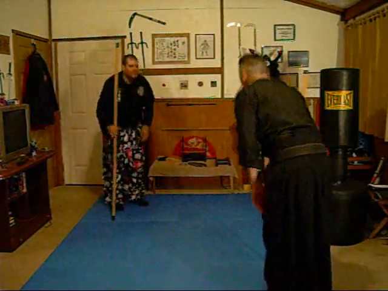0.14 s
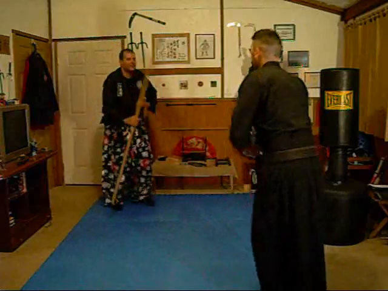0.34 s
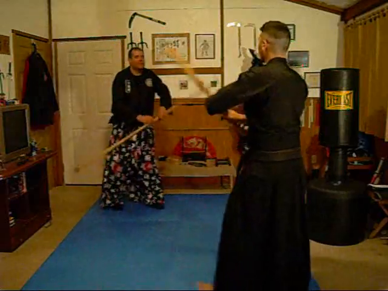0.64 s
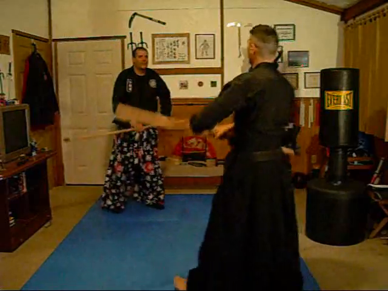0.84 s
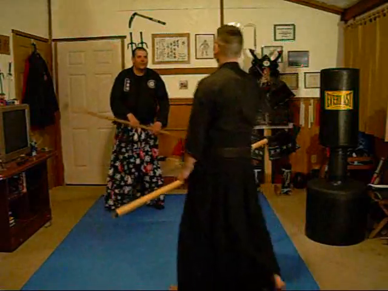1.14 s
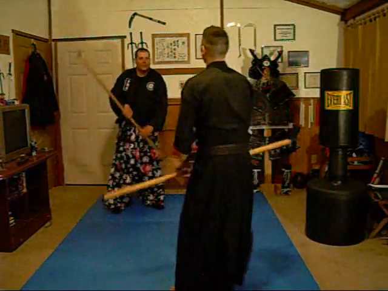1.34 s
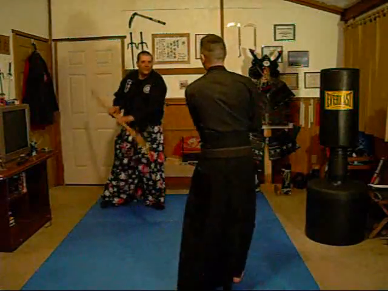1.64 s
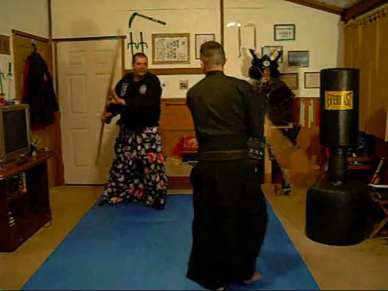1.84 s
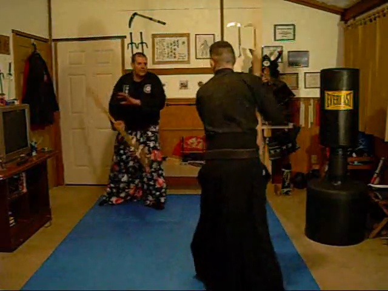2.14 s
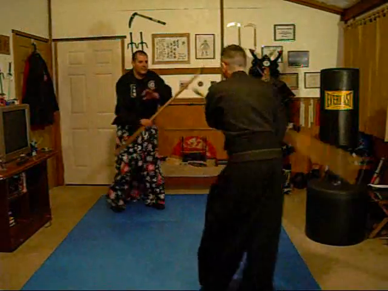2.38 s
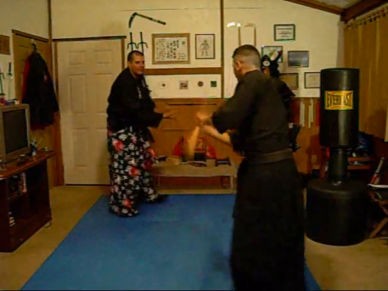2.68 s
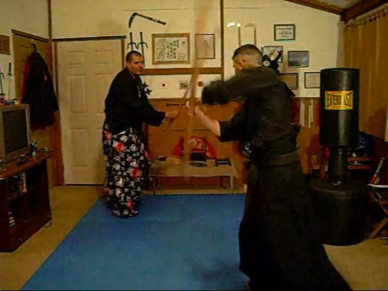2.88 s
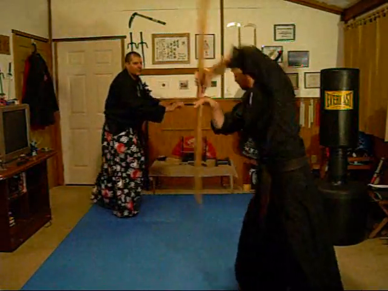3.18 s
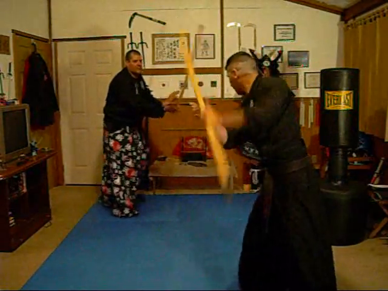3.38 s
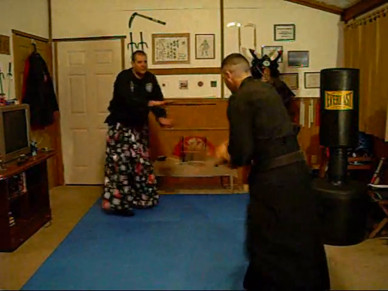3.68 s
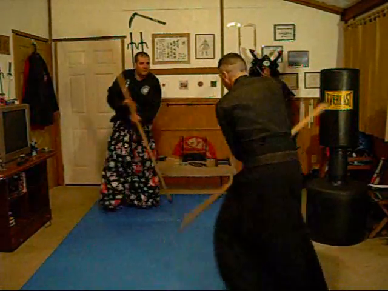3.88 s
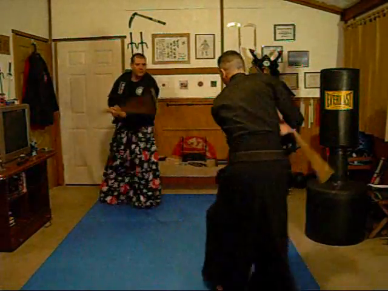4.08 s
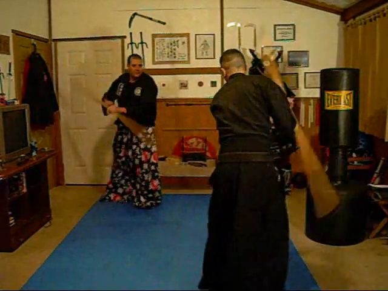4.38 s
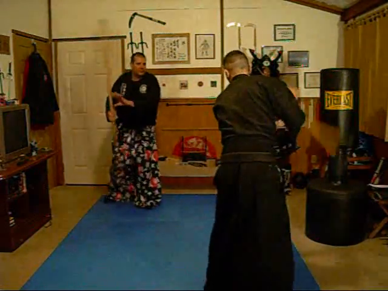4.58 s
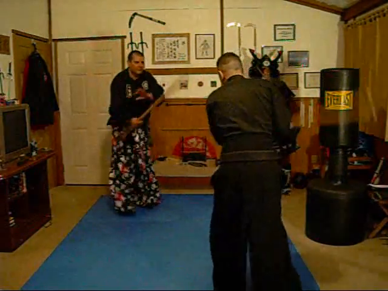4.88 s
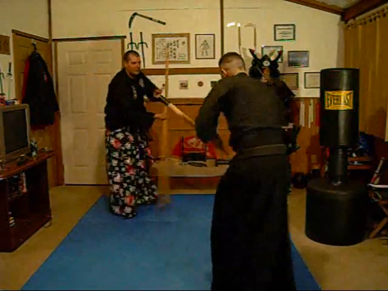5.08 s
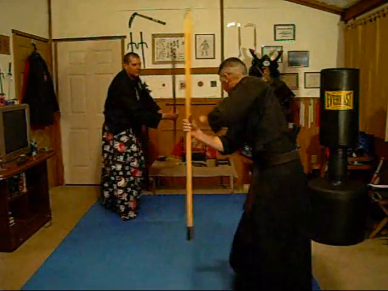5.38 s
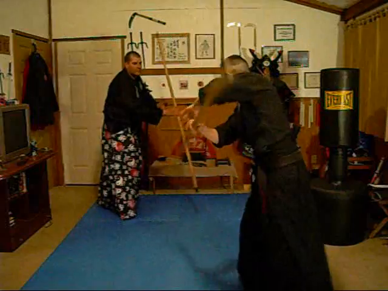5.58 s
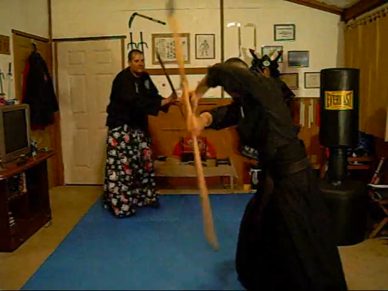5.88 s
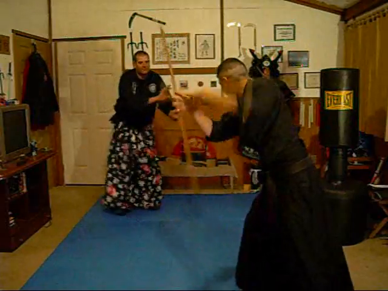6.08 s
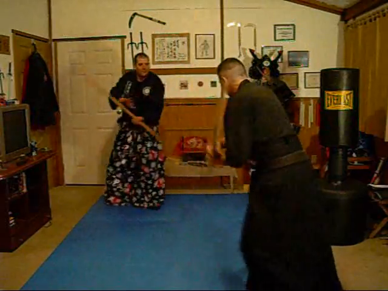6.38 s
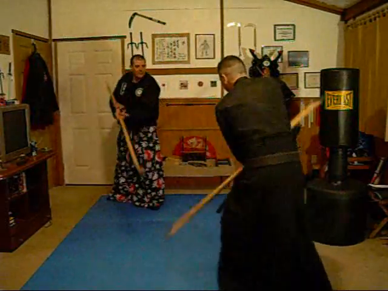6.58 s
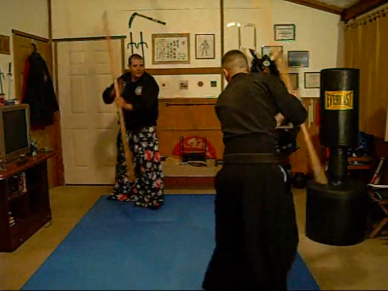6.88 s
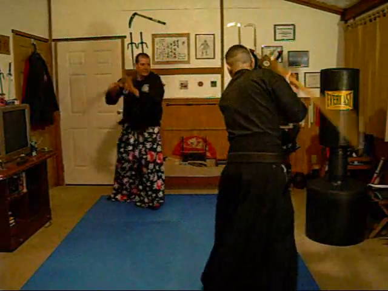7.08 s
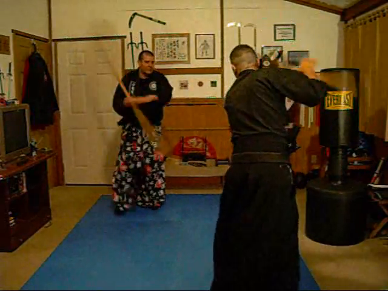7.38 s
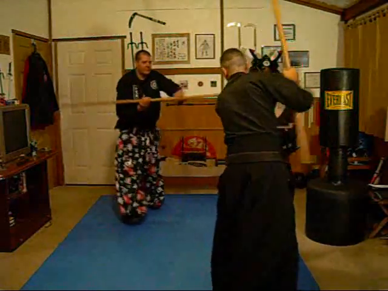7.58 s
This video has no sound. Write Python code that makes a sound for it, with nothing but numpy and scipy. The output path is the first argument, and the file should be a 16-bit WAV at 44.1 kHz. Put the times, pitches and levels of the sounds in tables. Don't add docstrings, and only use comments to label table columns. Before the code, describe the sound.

Two staffs spar a few steps from a cheap, muffled microphone. A first ringing knock gives way to swishing clothes, a sharp fabric snap and padded footsteps, then a pair of medium clacks. After a quieter spell, blows come closer together and peak in one harsh, clipped slam with a short roomy tail. Only faint wooden taps, grips, shuffles and flapping cloth remain over steady hiss and buzz.

```python
import sys
import numpy as np
from scipy import signal
from scipy.fft import rfft, irfft
from scipy.io import wavfile

SR = 44100
rng = np.random.default_rng(int(sys.argv[2]) if len(sys.argv) > 2 else 0)


def dump_mix(stems):
    frames = np.atleast_2d(stems).T
    limited = np.clip(frames, -1, 1)
    pcm = np.round(limited * 32767).astype(np.int16)
    wavfile.write(sys.argv[1], SR, pcm)


def volts_from_db(level):
    exponent = np.asarray(level, float) / 20
    return 10 ** exponent


N = 340893


def rms_one(x):
    return x / np.sqrt(np.mean(x ** 2) + 1e-20)


def band(x, order, edges_hz, kind):
    return signal.sosfilt(signal.butter(order, edges_hz, kind, fs=SR, output="sos"), x + 1e-18)


def at_hz(points, hz):
    point_hz, value = np.transpose(points)
    return np.interp(np.log(hz + 1), np.log(point_hz), value)


def coloured(x, spectrum):
    hz = np.arange(len(x) // 2 + 1) * SR / len(x)
    inside = (hz > spectrum[0][0] / 2) & (hz < 1.3 * spectrum[-1][0])
    return irfft(rfft(x) * volts_from_db(at_hz(spectrum, hz)) * inside, len(x))


def drift(rate_hz):
    r = np.exp(-80 * np.pi * rate_hz / SR)
    noise = rng.standard_normal(N // 40 + 2002)
    slow = signal.lfilter([1], [1, -2 * r, r * r], noise)[2000:]
    return np.interp(np.arange(N) / 40, np.arange(len(slow)), rms_one(slow))


def ring(x, hz, t60):
    r, w = volts_from_db(-60 / (t60 * SR)), 2 * np.pi * hz / SR
    return signal.lfilter([0, np.sin(w)], [1, -2 * r * np.cos(w), r * r], x)


def room(t, wet_db, gap_s, thicken_s):
    growth = np.clip((t - gap_s) / thicken_s, 0, 1)
    share = 0.015 + 0.1 * growth ** 2
    hits = rng.random(len(t)) < share
    return volts_from_db(wet_db) * np.sqrt(growth / share) * hits * rng.standard_normal(len(t))


def near_walls(x, wet_db, t60):
    t = np.arange(SR // 2) / SR
    paths = (t == 0) + room(t, wet_db, gap_s=0.009, thicken_s=0.025) * volts_from_db(-60 * t / t60)
    return signal.fftconvolve(x, paths / np.sqrt(np.sum(paths ** 2)))[:N]


def swell(middle_s, level_db, half_width_s):
    return volts_from_db(2 * level_db) * np.exp(-((np.arange(N) / SR - middle_s) / half_width_s) ** 2)


def snap(peak_s, level_db, rise_s, fade_s):
    t = np.arange(N) / SR - peak_s
    return volts_from_db(2 * level_db) * np.exp(np.minimum(t / rise_s, -t / fade_s))


# pitch_hz, t60_s
STAFF_MODES = [(740, .09), (1015, .12), (1340, .085), (1700, .07), (2080, .06), (2480, .058), (2880, .05),
               (3370, .05), (3770, .04)]


def bending(place_cm):
    order = 5 + np.arange(len(STAFF_MODES)) + 0.5
    return np.sin(np.pi * (order * place_cm / 180 - 1 / 4))


# start_s, level_db, struck_cm, gripped_cm, hardness_db_per_octave
BLOWS = [(0.69, -13, 8, 66.6, -9.5), (1.117, -34, 5.9, 20, 0), (1.233, -40, 20.7, 27, 5.5),
         (2.162, -18, 32.9, 81, 5), (2.313, -23, 6.8, 64.8, -7.5), (3.111, -32, 10.2, 63, -2),
         (4.673, -21.5, 79.5, 79, 2.5), (4.88, -11, 64.5, 81.7, 6.5), (5.274, 4, 44.1, 74.7, 0.5),
         (5.835, -36, 48.6, 59.4, 7.5), (5.899, -30, 25.6, 48, 0.5), (6.317, -30.5, 81.9, 89, 2.5),
         (6.444, -31.5, 6.3, 21.2, 3), (7.105, -33, 74.7, 79.2, -1), (0.686, -34.5, 7.7, 66.6, 0),
         (4.663, -29.5, 79.5, 84, 3)]
RADIATION_DB = [-10.5, -10, -2.5, -1.5, 1.5, 0.5, -2, -3, -4.5]
# pitch_ratio, level_db, t60_ratio
LIGHTER_STAFF = (1.035, -9, .7)
# pitch_hz, t60_s
ROOM_T60 = [(700, 0.66), (1000, 0.22), (1500, 0.46), (2500, 0.4), (4000, 0.34)]


def staffs():
    out, t = np.zeros(N + SR), np.arange(SR // 2 + SR // 4) / SR
    pitch_ratio, lighter_db, t60_ratio = LIGHTER_STAFF
    mode_hz = np.array(STAFF_MODES)[:, 0]
    for start_s, level_db, struck_cm, gripped_cm, hardness_db in BLOWS:
        echoes = room(t, wet_db=-30.5, gap_s=0.0036, thicken_s=0.016)
        swing = np.abs(bending(struck_cm) * bending(gripped_cm)) + 0.03
        tilt_db = hardness_db * np.log2(mode_hz / 2000)
        gains = swing * volts_from_db(level_db + np.array(RADIATION_DB) + tilt_db)
        knock = 0
        for (hz, t60), gain in zip(STAFF_MODES, gains):
            paths = (t == 0) + echoes * volts_from_db(-60 * t / at_hz(ROOM_T60, hz))
            lighter = volts_from_db(lighter_db) * ring(paths, pitch_ratio * hz, t60_ratio * t60)
            both = band(ring(paths, hz, t60) + lighter, 2, 0.7 * hz, "high")
            knock = knock + gain * volts_from_db(6.5) * rng.choice([-1, 1]) * both
        splinter = 0.11 * rng.standard_normal(len(t)) * np.exp(-t / 0.002)
        crack = band(splinter + echoes * volts_from_db(-60 * t / 0.25), 3, [1300, 4200], "band")
        knock = knock + volts_from_db(15.5) * np.sqrt(np.sum(gains ** 2)) * crack
        knock = knock * (1 - np.exp(-t / 0.0013))
        if level_db > 0:
            knock = knock * volts_from_db(1.5)
        start = round((start_s - 0.0004) * SR)
        out[start:start + len(knock)] += knock
    return band(out[:N], 4, 600, "high")


# start_s, level_db, chatter_s, t60_s
SLAM = (5.273, 5.1, 0.042, 0.34)
# pitch_hz, level_db_per_hz
SLAM_COLOUR = [(400, -22.5), (800, -16), (1250, -8), (1700, -2), (2300, 2), (3200, -8), (4300, -11.5)]
# pitch_hz, level_db, t60_s
LOOSE_RING = [(1015.4, -9, 0.49), (1345.5, -16, 0.47), (1674, -4, 0.42), (2051, -1, 0.23), (2428, -14, .32)]


def slam():
    start_s, level_db, chatter_s, t60 = SLAM
    t = np.maximum(np.arange(N) / SR - start_s, 0)
    decay_db = -60 * np.maximum(t - chatter_s, 0) / t60
    envelope = (1 - np.exp(-t / 0.0017)) * volts_from_db(level_db + decay_db)
    out = envelope * rms_one(coloured(rng.standard_normal(N), SLAM_COLOUR))
    for hz, ring_db, ring_s in LOOSE_RING:
        flutter = rms_one(ring(rng.standard_normal(N), hz, 0.24))
        out += (t > 0) * volts_from_db(ring_db + 3 - 60 * t / ring_s) * flutter
    return out


# start_s, peak_db
GRIPS = [
    (1.1183, -28.5),
    (1.2336, -28.5),
    (1.3938, -24),
    (2.5035, -25),
    (5.9419, -18),
    (7.7007, -28),
]


def grips():
    out, t = np.zeros(N + SR), np.arange(2000) / SR
    for start_s, peak_db in GRIPS:
        start = round(start_s * SR)
        tick = rng.standard_normal(len(t)) * np.exp(-t / 0.0038)
        out[start:start + len(t)] += volts_from_db(peak_db - 3.5) * tick
    return 2.4 * band(out[:N], 2, [1600, 4300], "band")


def rustle(spectrum, power, grains_per_s, grain_db, patchy_db):
    grains = (rng.random(N) < grains_per_s / SR) * rng.standard_normal(N)
    source = rng.standard_normal(N) + volts_from_db(grain_db) * grains
    level = np.sqrt(power) * volts_from_db(patchy_db * drift(28))
    return level * rms_one(coloured(source, spectrum))


# middle_s, swish_db, half_width_s, flap_db (re swish)
SWINGS = [(.17, -44.5, 0.074, -15), (0.53, -46.5, 0.028, 5), (.66, -55, 0.027, -1),
          (1.001, -44.5, .03, -13), (1.49, -39.5, 0.023, 1.5), (1.67, -40, 0.033, -0.5),
          (1.78, -43, 0.12, 2), (1.89, -43, 0.014, 2.5), (2.11, -52, 0.18, -7), (2.342, -35, 0.027, 0.5),
          (2.58, -45, 0.2, 5.5), (2.76, -37, 0.042, -12), (3.34, -47, 0.052, 8.5), (3.86, -42, 0.079, 0.5),
          (4.3, -40, 0.063, -3), (4.47, -43.5, 0.057, 2), (4.81, -50.5, 0.041, 2), (5.1, -42.5, 0.041, 2),
          (5.231, -45.5, 0.047, 4.5), (5.701, -49, 0.06, 5.5), (5.96, -43, 0.12, -8),
          (6.38, -49.5, 0.063, 4.5), (6.53, -40, 0.057, 3), (6.82, -42.5, 0.065, 1),
          (7.0, -45.5, 0.071, 1.5), (7.119, -42, 0.067, -1.5), (7.28, -40, 0.039, 4.5),
          (7.4, -46.5, 0.069, 5), (7.54, -36.5, 0.11, -1), (7.7, -42, 0.052, -6)]
# peak_s, swish_db, rise_s, fade_s, flap_db (re swish)
SNAPS = [(0.89, -41.5, .008, 0.12, -5.5), (1.397, -28.5, 0.0026, 0.046, -16),
         (1.44, -23.5, 0.01, 0.024, -12), (2.02, -35.5, 0.014, 0.034, 3.5),
         (2.509, -31.5, 0.0033, 0.039, 2.5), (2.974, -34.5, 0.011, 0.037, 1),
         (3.61, -39.5, 0.0025, 0.022, -0.5), (4.121, -33.5, 0.016, 0.024, 4),
         (4.641, -28, 0.0056, 0.044, -1), (5.9, -35.5, .004, 0.05, 2), (6.2, -36.5, 0.036, 0.028, 1),
         (6.685, -41.5, 0.013, 0.042, 4)]
# middle_s, level_db, half_width_s
STEPS = [(.47, -46.5, 0.032), (.92, -47.5, .057), (1.47, -44, 0.044), (1.6, -41, 0.029), (1.7, -41, 0.025),
         (1.83, -45.5, 0.059), (2.04, -49, 0.054), (2.34, -40.5, 0.026), (2.54, -42.5, 0.094),
         (2.74, -44.5, 0.054), (2.97, -48, 0.096), (3.35, -39, 0.038), (3.62, -50, .046),
         (3.86, -46.5, 0.069), (4.16, -44, 0.08), (4.34, -47.5, 0.054), (4.46, -50.5, 0.067),
         (4.66, -39.5, 0.026), (4.9, -45.5, 0.056), (5.12, -47.5, 0.13), (5.66, -52, 0.11),
         (5.93, -50, 0.13), (6.22, -40.5, 0.044), (6.5, -44, 0.051), (6.72, -46.5, 0.071),
         (6.87, -51, 0.072), (7.1, -49, 0.085), (7.3, -49.5, 0.062), (7.52, -44.5, 0.11),
         (7.71, -46, 0.037)]
# pitch_hz, level_db_per_hz
SWISH = [(1500, -17.5), (2200, -8), (3000, 0.5), (3600, 4), (4400, 0)]
FLAP = [(600, -20.5), (950, -9), (1500, -5), (2100, -4), (3000, -6)]
SHUFFLE = [(90, -20), (160, -9.5), (300, -3.5), (600, 0.5), (900, -0.5), (1400, -10)]


def movement():
    swish_power, flap_power = volts_from_db(2 * -57), volts_from_db(2 * (-57 + 2.5))
    for shape, rows in ((swell, SWINGS), (snap, SNAPS)):
        for *envelope, flap_db in rows:
            power = shape(*envelope)
            swish_power = swish_power + power
            flap_power = flap_power + volts_from_db(2 * flap_db) * power
    shuffle_power = volts_from_db(2 * -59) + sum(swell(*step) for step in STEPS)
    swish = rustle(SWISH, swish_power, grains_per_s=400, grain_db=3, patchy_db=1.5)
    flap = rustle(FLAP, flap_power, grains_per_s=43, grain_db=2.0, patchy_db=1.97)
    shuffle = rustle(SHUFFLE, shuffle_power, grains_per_s=200, grain_db=12, patchy_db=1.5)
    return swish + flap + shuffle


# start_s, peak_db, pitch_hz
HEELS = [
    (1.453, -40, 160),
    (1.808, -45, 167),
    (2.25, -46, 177),
    (3.306, -36.5, 180),
    (3.611, -44, 219),
    (4.353, -47, 177),
    (4.878, -43, 179),
    (6.18, -53, 187),
    (6.436, -43, 150),
    (7.4, -49, 174),
]


def heels():
    out, push = np.zeros(N), np.hanning(900)
    for start_s, peak_db, hz in HEELS:
        grit = push * rng.standard_normal(900)
        thud = ring(np.pad(grit, (0, SR // 4)), hz, 0.15)
        thud = volts_from_db(peak_db) * thud / np.abs(thud).max()
        start = round(start_s * SR)
        out[start:start + len(thud)] += thud[:N - start]
    return out


# middle_s, level_db
SHIFTS = [(0.04, -55), (0.64, -45), (0.98, -46), (1.5, -42.5), (1.82, -50), (1.95, -52), (2.05, -49),
          (2.16, -52), (2.38, -44), (2.48, -57), (2.64, -35.5), (2.78, -47), (2.96, -49), (3.06, -51.0),
          (3.7, -43), (4.18, -43), (4.51, -48), (4.88, -59.5), (5.0, -38), (5.22, -43), (5.46, -51.5),
          (6.02, -43.5), (6.26, -50), (6.74, -45.0), (7.68, -38.5)]


def floor_boards():
    tremor = ring(ring(rng.standard_normal(N), 19, 0.35), 22, 0.16)
    spring_hz = 19.9 + 3.3 * drift(3.3)
    bounce = np.sqrt(2) * np.cos(2 * np.pi * np.cumsum(spring_hz) / SR)
    sag_power = sum(swell(middle_s, level_db, 0.048) for middle_s, level_db in SHIFTS)
    return volts_from_db(-57.5) * rms_one(tremor) + np.sqrt(sag_power) * bounce


# pitch_hz, level_db_per_hz
HISS = [(40, -2.5), (130, -11.5), (250, 0.5), (330, -14.5), (410, 0.5), (500, -6.5), (1200, -8),
        (2500, -4.5), (3700, -5), (4400, 0.5)]
BUZZ = [-64.5, -65, -63.5, -65.5, -74.5, -74, -67, -83, -70, -67.5, -82.5, -93, -73, -65]


def electronics():
    t = np.arange(N) / SR
    buzz_hz, hiss_db = 29.97, -45
    buzz = 0
    for harmonic, level_db in enumerate(BUZZ, 1):
        buzz = buzz + np.sqrt(2) * volts_from_db(level_db) * np.cos(2 * np.pi * buzz_hz * harmonic * t)
    return volts_from_db(hiss_db) * rms_one(coloured(rng.standard_normal(N), HISS)) + buzz


def scene():
    soft = near_walls(movement(), wet_db=-28.0, t60=0.14)
    return (staffs() + slam() + grips() + soft + heels() + floor_boards() + electronics())[None]


def low_pass(x):
    return signal.sosfilt(signal.butter(12, 15810, fs=SR, output="sos"), x)


def record(dry):
    converter_top, band_edge_hz = 1.45, 3994
    saturated = np.clip(dry, -converter_top, converter_top)
    steep = signal.cheby2(10, 40, 1.0916 * band_edge_hz, fs=SR, output="sos")
    narrow = signal.sosfiltfilt(steep, saturated)
    return low_pass(np.clip(narrow, -1, 1))


dry = scene()
out = record(dry)
dump_mix(out)
```